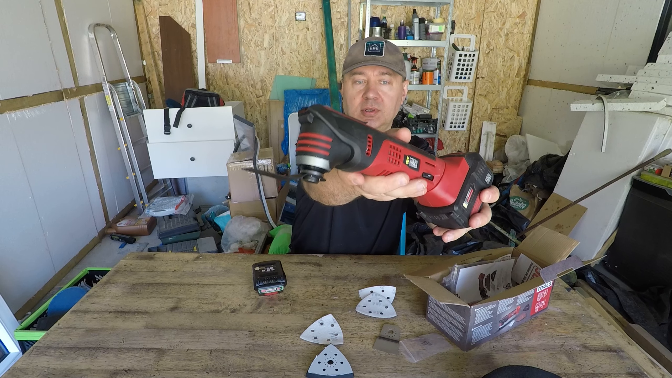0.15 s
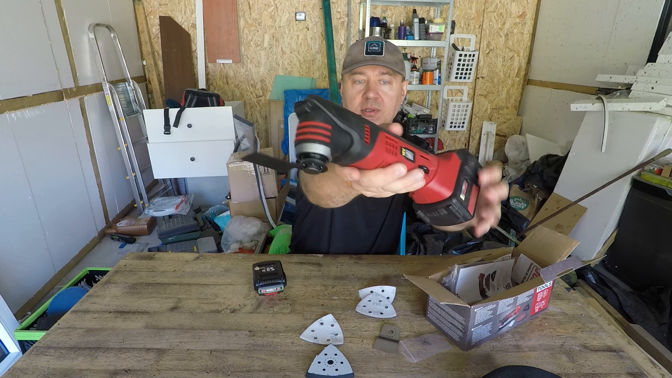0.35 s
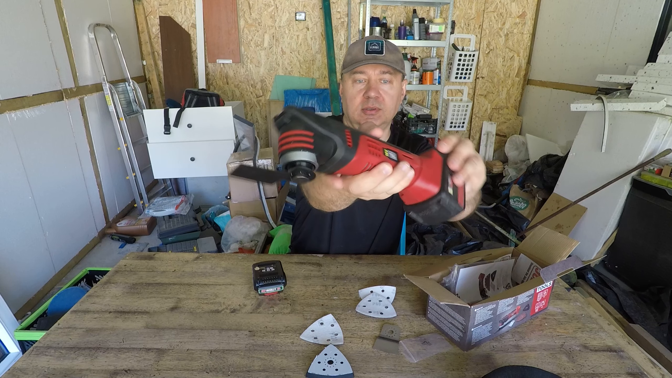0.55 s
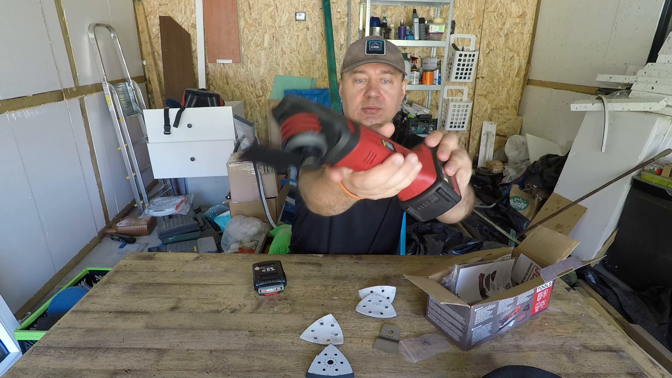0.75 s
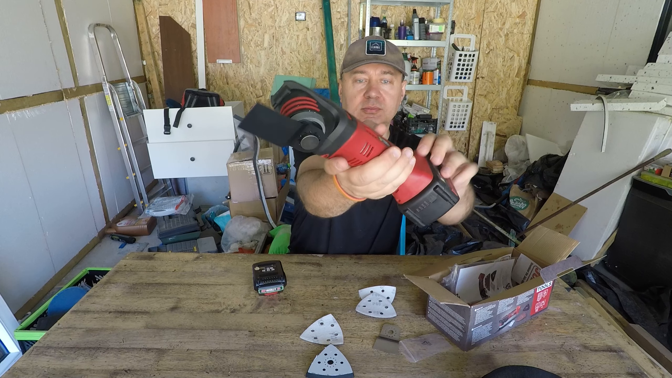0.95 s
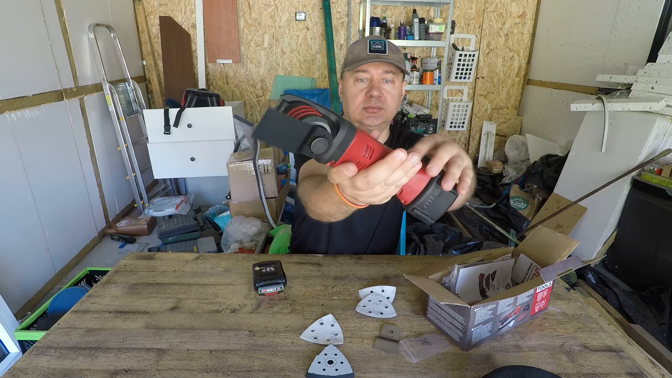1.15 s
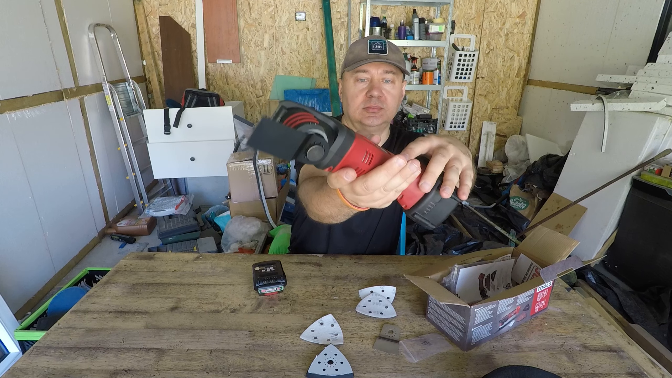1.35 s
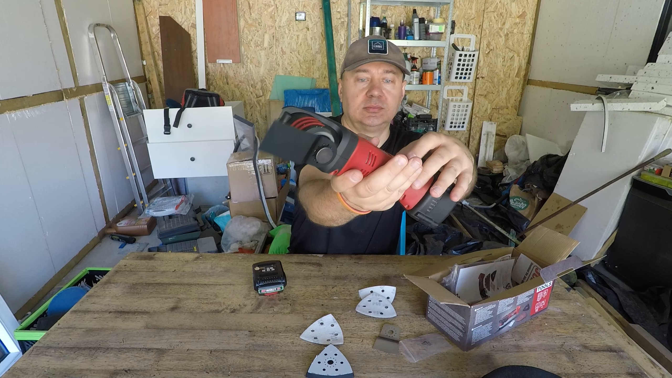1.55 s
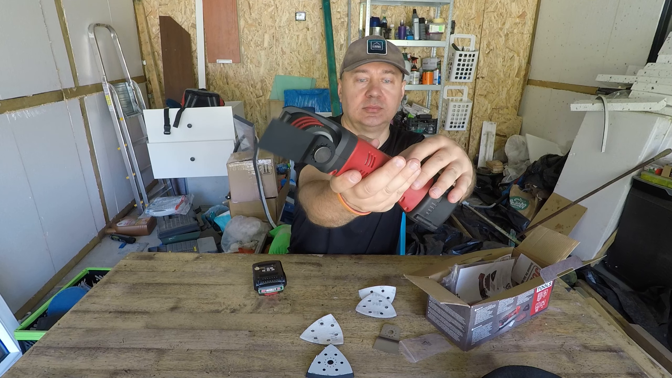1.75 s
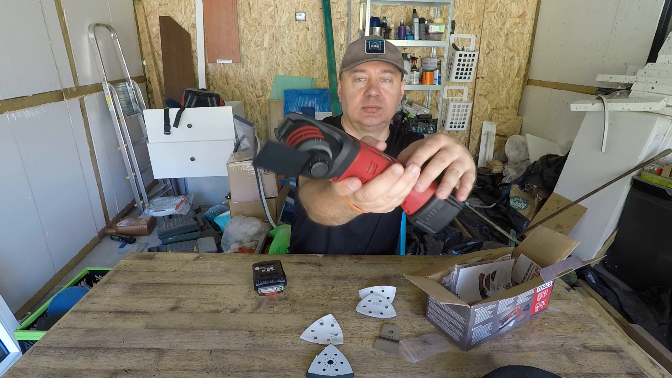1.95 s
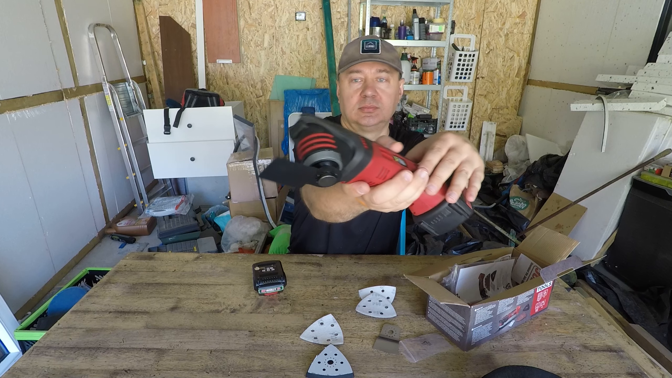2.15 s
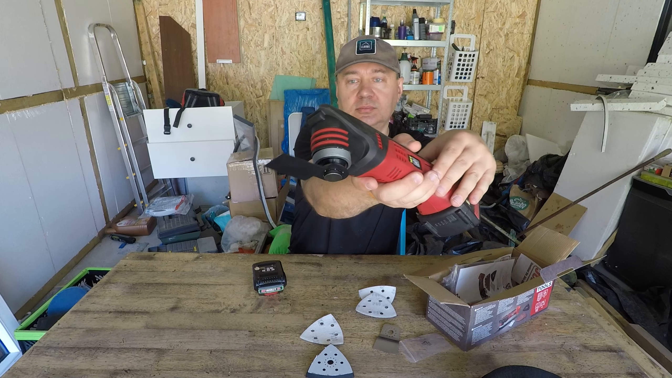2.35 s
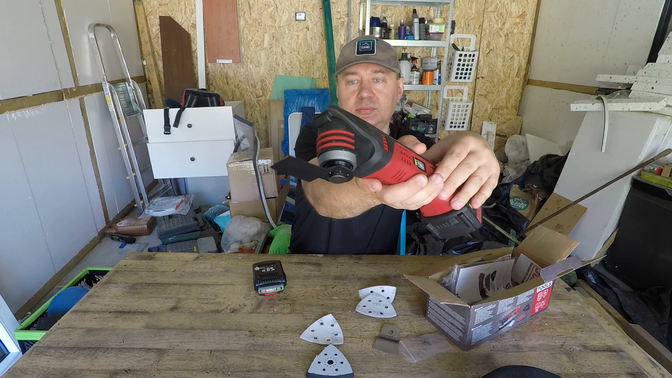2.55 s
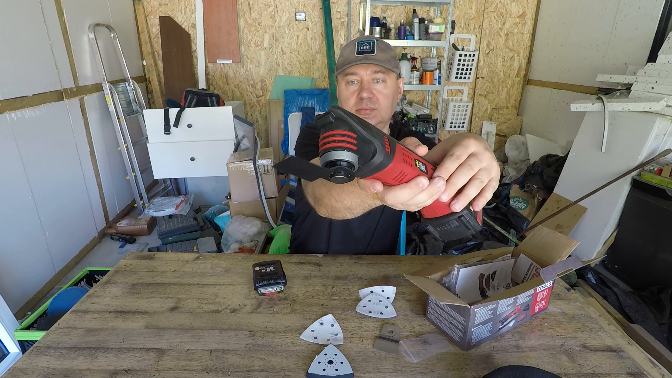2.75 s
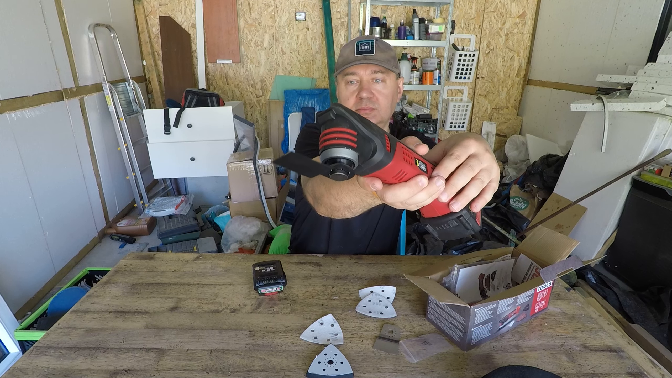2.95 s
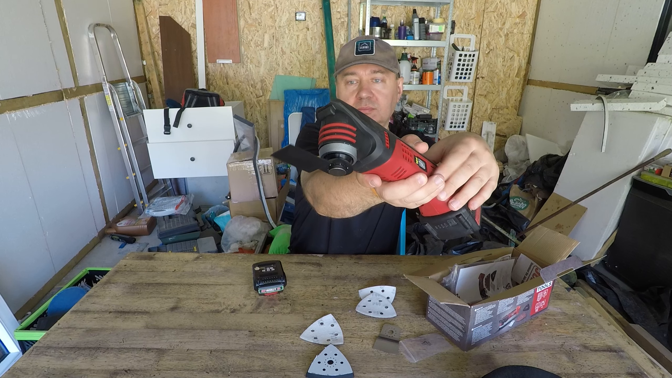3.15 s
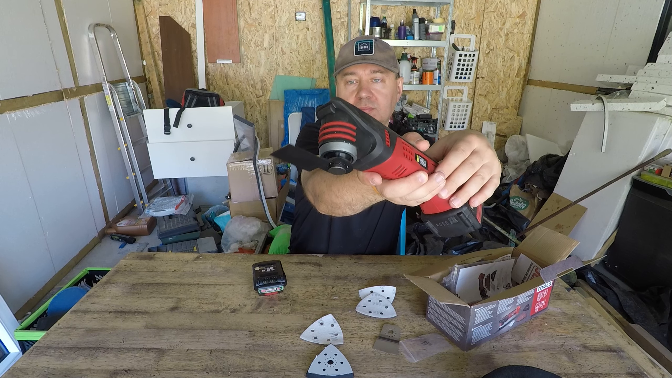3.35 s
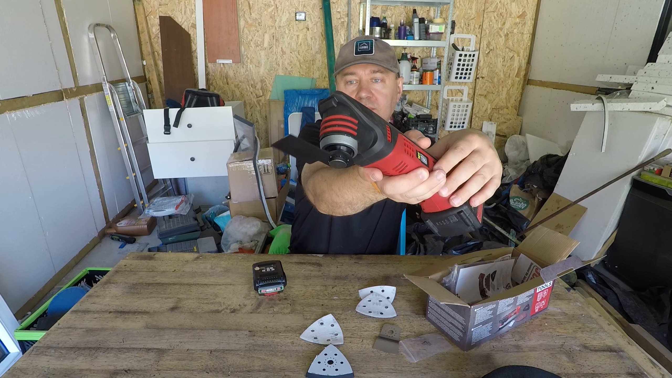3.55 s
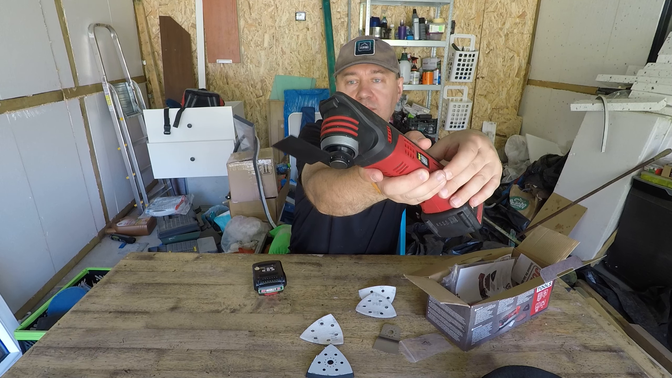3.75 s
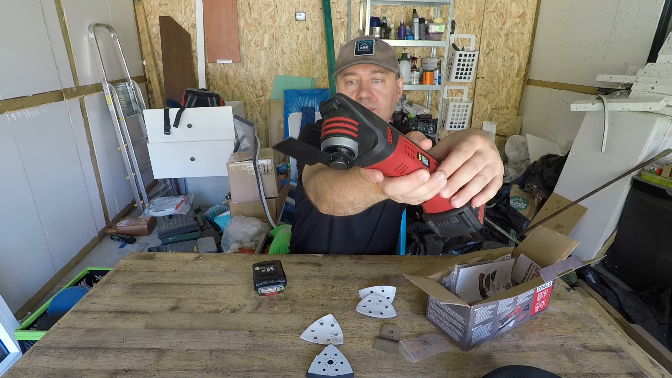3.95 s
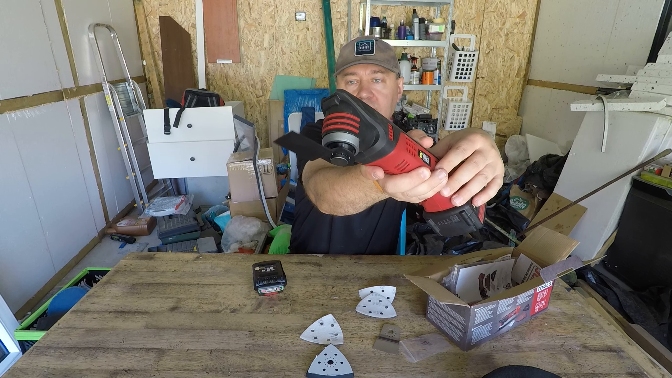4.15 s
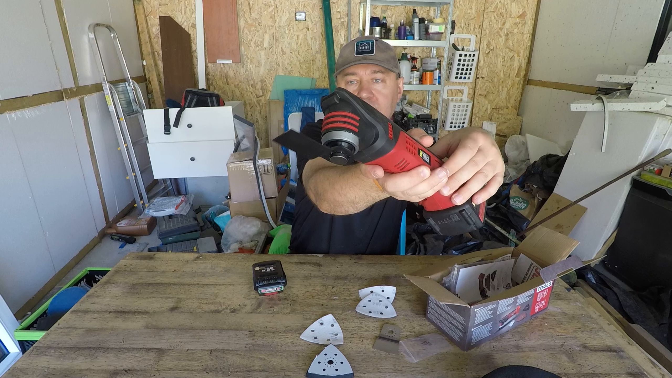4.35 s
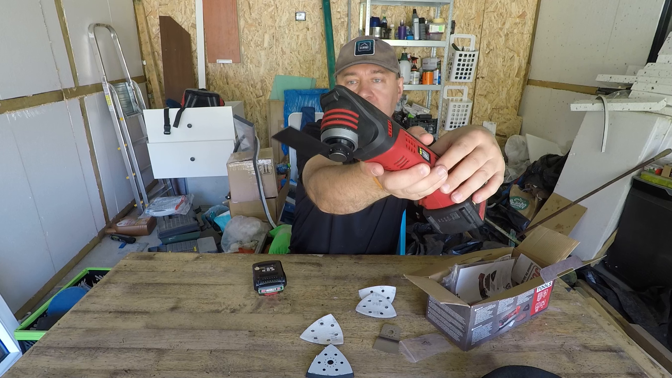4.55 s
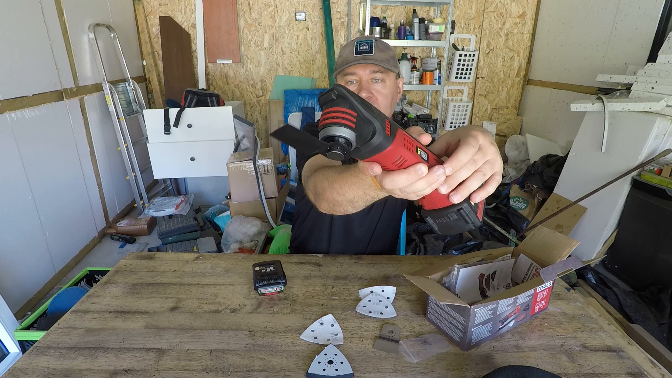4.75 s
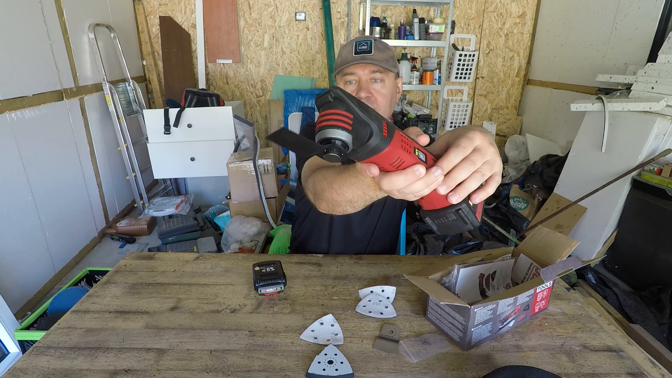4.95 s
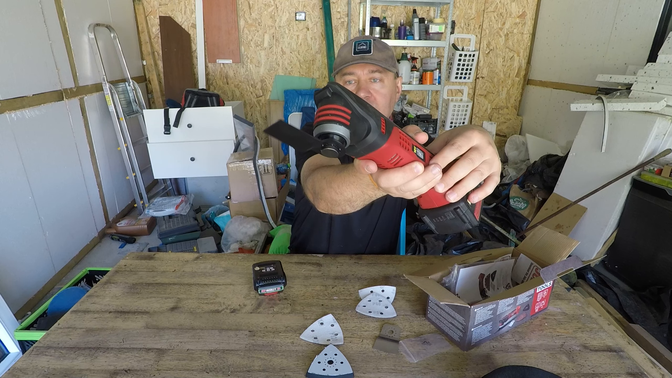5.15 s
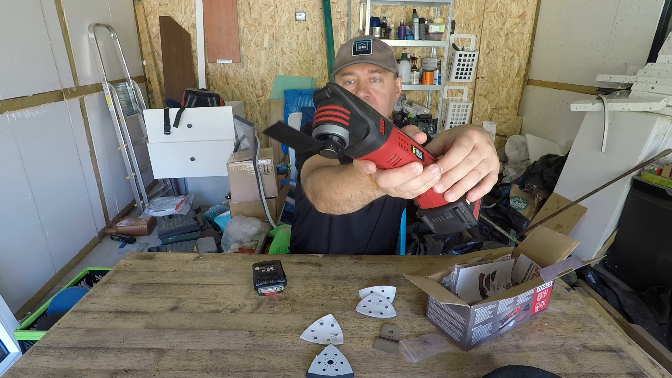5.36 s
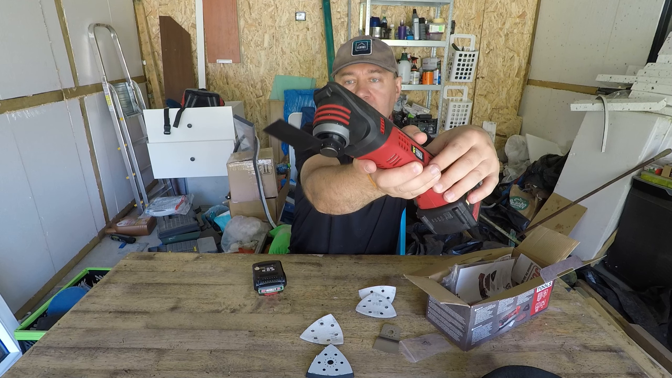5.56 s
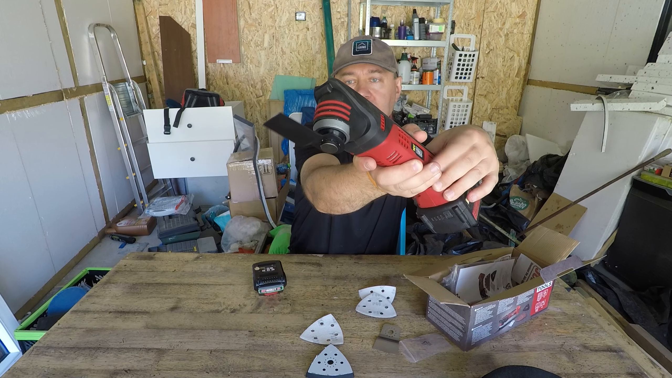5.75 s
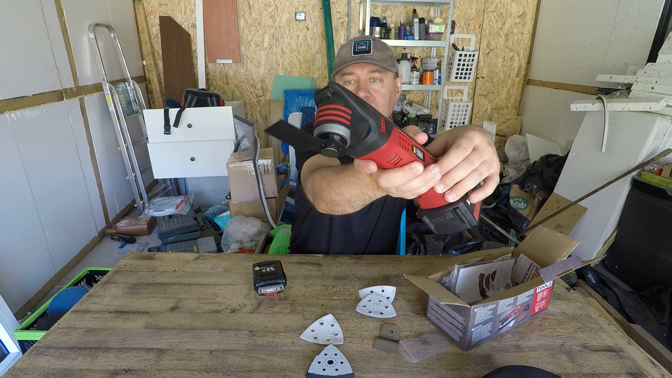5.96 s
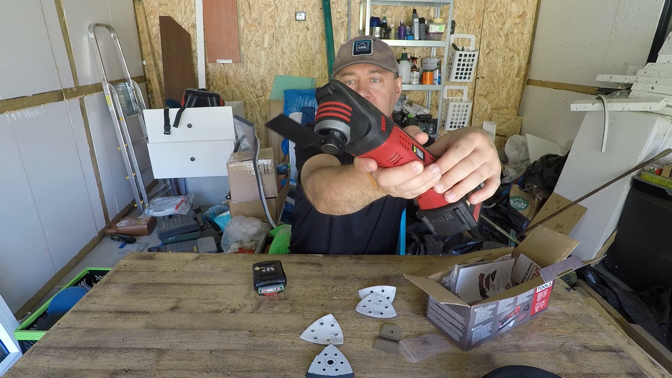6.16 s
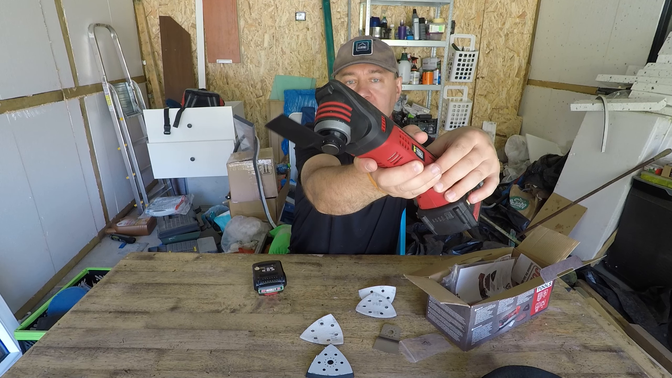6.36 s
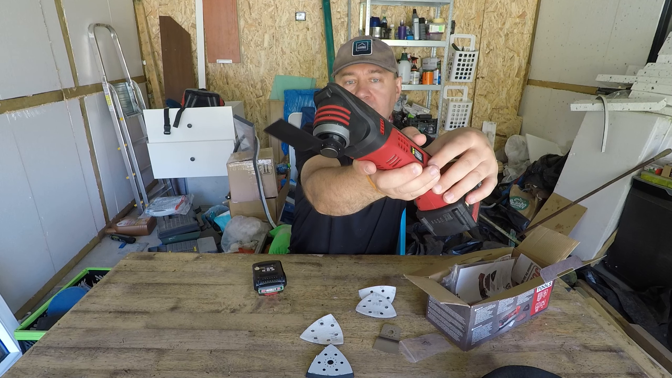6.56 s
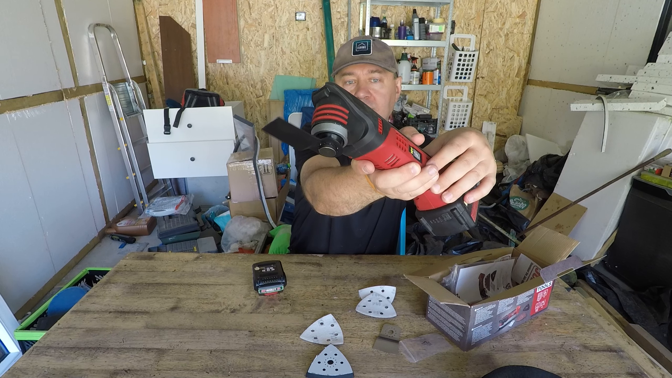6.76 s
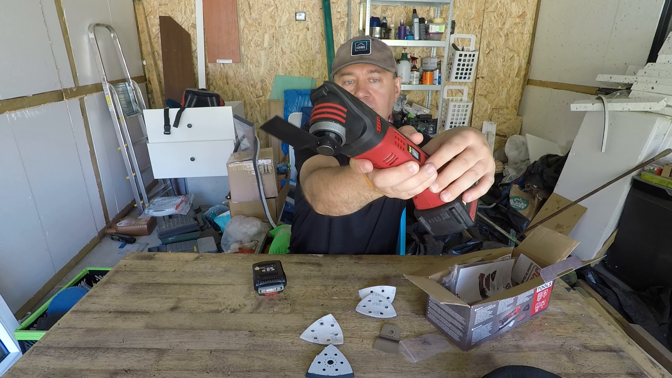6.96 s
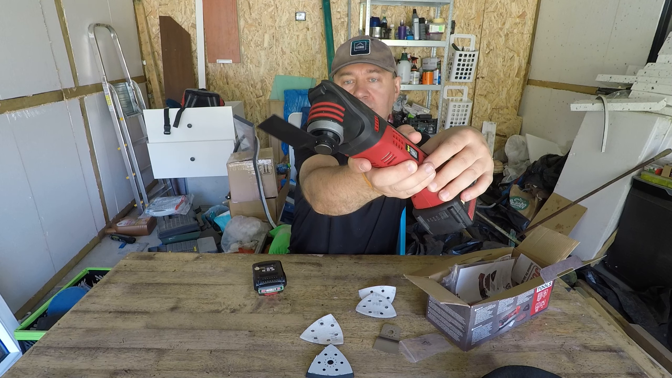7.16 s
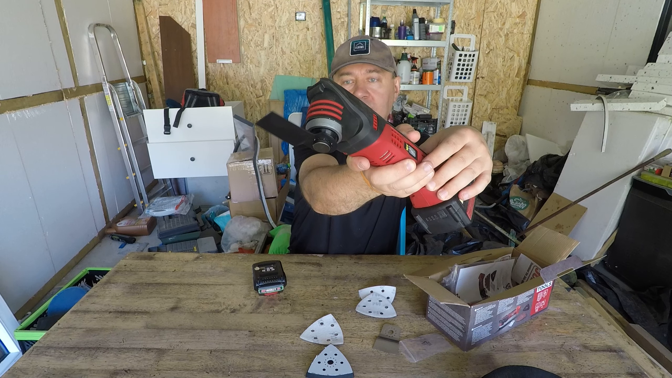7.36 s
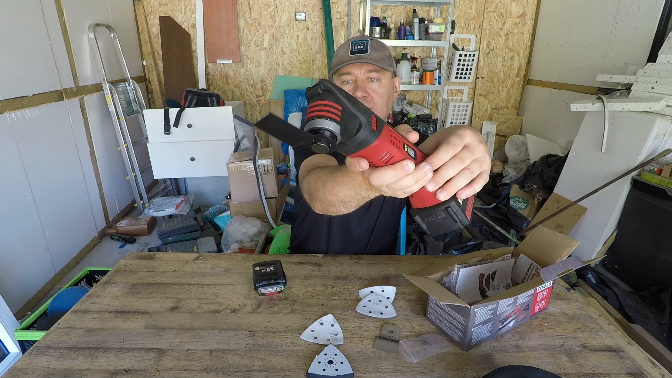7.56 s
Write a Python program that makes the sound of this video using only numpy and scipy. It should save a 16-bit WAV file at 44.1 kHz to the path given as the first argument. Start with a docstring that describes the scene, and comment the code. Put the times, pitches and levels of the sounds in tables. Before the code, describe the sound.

A cordless oscillating tool is already running unloaded in a small garage, close to a microphone with little bass. From 0 to 2.5 seconds it idles slowly: a quiet, dry, grainy rattle with a low buzz, a thin high electronic tone and brief soft finger rubs on the grip. At about 2.5 and 2.8 seconds the speed rises in quick succession, then again near 3.4, 3.9, 4.5 and 5.0, each step pushing the pitch up with a short surge of effort and rougher clatter, then settling briefly. Around 5.5 it reaches full speed, much louder: a dense, piercing, buzzy whine with airy fan hiss and short bare-wall reflections. It holds steadily, its tone colour shifting around 6.2 and flickering briefly near 7.1 and 7.4. At about 7.6 the pitch starts to drop slightly as the sound ends, still running.

```python
"""In a garage, a cordless oscillating tool runs unloaded at arm's length from a small microphone.
Its dial steps the motor up, with one small step down at the end; after each click the motor works harder.
The eccentric shaft hums on multiples of its turn rate through the housing, and the fork rattles twice a turn.
The fan hisses, the speed controller sings a thin tone, fingers slide on the grip and hands rumble below.
The sound passes through bare-wall reflections (rattle only) and a microphone that cuts the bass and the top."""
import sys
import numpy as np
from scipy import signal
from scipy.fft import rfft, irfft
from scipy.io import wavfile
from scipy.ndimage import uniform_filter1d

SR = 44100
rng = np.random.default_rng(int(sys.argv[2]) if len(sys.argv) > 2 else 0)


def transcribe(signal):
    """Save signal, clipped to [-1, 1], as a 16-bit WAV file at the path in sys.argv[1]."""
    frames = np.atleast_2d(signal).T
    limited = np.clip(frames, -1, 1)
    pcm = np.round(limited * 32767).astype(np.int16)
    wavfile.write(sys.argv[1], SR, pcm)


N = 339570

# clicks of the speed dial, the first row being the setting at the start:
# click_s, turn_rate_hz, motor_lag_s
DIAL_CLICKS = [(0, 66.05, .1), (2.512, 85.6, .084), (2.805, 98.5, .142), (3.386, 133.3, .068),
               (3.934, 159.8, .079), (4.478, 188, .053), (4.972, 221.7, .049), (5.487, 251.6, .038),
               (7.632, 233, .041)]


def hum(turn_hz, turn, hum_db, move_db, effort, count=58, step=32):
    """Forced vibration: harmonics of the turn rate, weighted by housing resonances, each wandering."""
    # strongest harmonics at full speed, changing over as the tool is turned:
    # order, arrival_lift_db, first_db, later_db, change_s, flip_lift_db
    whine_rows = [(1, -2, -28.5, -27, 6.2, 0.1), (2, 7.5, -36.5, -36.5, 6.2, 10.5),
                  (3, -4.5, -20.5, -23.5, 6.2, 0.5), (4, 5.5, -35.5, -43, 6.4, 11.5),
                  (5, 7, -35, -42, 7.8, -1.5), (6, 17, -36, -34, 6.34, 7), (7, 2.5, -28, -33, 6.58, -1.5),
                  (8, 1.5, -22.5, -35, 6.19, 0.5), (9, 4.5, -28.5, -21, 6.26, -7),
                  (10, 4, -29.5, -37, 6.86, 2), (13, 7, -42, -32.5, 6.3, 7),
                  (14, -20, -17.5, -29.5, 6.52, -4), (15, -2, -21.5, -36.5, 6, 8),
                  (16, 0, -24, -21.5, 6.7, -11), (18, -3, -22.5, -21, 6.8, -8),
                  (19, 7, -42, -27.5, 6.1, -11), (20, -1, -30, -28, 6.25, -6), (22, -16, -26, -32, 6.8, -2)]
    # the other harmonics at full speed: order, level_db (re full_db)
    full_rows = [(11, -11.5), (12, -13), (17, -15), (21, -12), (23, -13.5), (24, -9.5), (25, -13),
                 (26, -17.5), (27, -23), (28, -20), (29, -17.5), (30, -15.5), (31, -24), (32, -21.5),
                 (33, -37), (34, -41)]
    # harmonics that stand out while a dial setting holds, one list a setting:
    # order, level_db, surge_lift_db
    held_lists = [
        [(10, -53.5, 0)],
        [(4, -47, 1.5), (5, -38, -4.5), (11, -31, -7.5), (15, -39, -1)],
        [(1, -45.5, 5), (2, -44.5, -4), (4, -37, -4.5), (5, -38, 3), (6, -34.5, -11), (7, -46.5, 12),
         (11, -31.5, -7), (12, -32.5, -5), (15, -43, 22), (23, -42, 8), (28, -38.5, 8), (54, -54, -9),
         (55, -49, -9)],
        [(1, -41, 9), (2, -42, -7), (3, -37, 1.5), (5, -27, -8), (8, -36, 5), (10, -30.5, 2), (12, -27.5, -3),
         (14, -40, 17), (20, -28.5, 0.5)],
        [(1, -29, -2.5), (2, -53.5, 3), (3, -35, 9), (4, -21.5, -14.5), (5, -31, -11), (6, -38, 1.5),
         (8, -36, 1.5), (9, -34.5, 4), (10, -33, 10), (11, -34, 18), (13, -42, -6), (14, -32, -8), (15, -42, 2),
         (16, -39, -3), (17, -34, -3), (18, -20.5, -5), (19, -30, -5), (20, -23.5, 3), (21, -32, 1.5),
         (22, -33, 1), (23, -32, -3)],
    ]
    # indices into the dial clicks, one for each list of held harmonics
    held_rows = (0, 3, 4, 5, 6)
    # resonances of the housing: centre_hz, width_hz (at half gain), gain_db
    housing = [(200, 210, -24), (338, 115, -21.5), (506, 100, -19), (665, 50, -15), (737, 41, -20.5),
               (911, 120, -15), (1160, 89, -25), (1230, 140, -19.5), (1434, 50, -12.5), (1720, 180, -21),
               (1863, 87, -11), (2250, 84, -12.5), (2320, 100, -15.5), (2510, 190, -19), (2980, 210, -18),
               (3696, 65, -10.5), (3960, 110, -13.5), (4385, 102, -10), (4830, 730, -23.5),
               (5600, 350, -17.5), (6340, 570, -34), (7550, 370, -40), (8770, 550, -38), (10110, 150, -42),
               (13300, 860, -39.5)]
    # brief drops of the whine to low harmonics: centre_s, length_s, depth (factor on the lift)
    flip_rows = [(7.094, 0.025, 0.88), (7.413, 0.047, 1.08)]
    # a low harmonic that swells at idle: order, start_s, end_s, level_db
    drone_order, drone_start, drone_end, drone_db = (3, 0.8, 1.5, -48.5)
    settle_lags, hold_on_s, blend_s = 2.93, 0.097, 0.079  # held harmonics last into the next setting
    full_row, full_db, arrival_s, change_s = 7, -22, 0.17, 0.09
    whine_wander_db, strain_rough_db = 2, 5

    s = np.arange(0, N, step) / SR  # gains are computed once every few samples

    def ramp(late):
        return np.clip(late / blend_s + 1, 0, 1)

    def by_order(table):
        return {round(row[0]): row[1:] for row in table}

    whines, others = by_order(whine_rows), by_order(full_rows)
    held_tables = [by_order(table) for table in held_lists]
    # the hum breaks up while the speed changes
    rough_db = strain_rough_db * strain(turn_hz)[::step]
    flip = sum(depth * np.exp(-((s - at) / length) ** 4) for at, length, depth in flip_rows)
    late = s - DIAL_CLICKS[full_row][0] - hold_on_s
    full = ramp(late)
    arrival = np.exp(-np.maximum(late, 0) / arrival_s)

    out = 0
    for k in range(1, count + 1):
        drive_db = hum_db[::step] + 2.0 * walk(4.94)[::step]
        gain = resonance(k * turn_hz[::step], housing) * undb(drive_db)

        for row, orders in zip(held_rows, held_tables):
            if k not in orders:
                continue
            start, _, lag = DIAL_CLICKS[row]
            if row > 0:
                start = start + settle_lags * lag
            end = DIAL_CLICKS[row + 1][0] + hold_on_s
            held = ramp(np.minimum(s - start, end - s))
            level_db, lift_db = orders[k]
            gain = (1 - held) * gain + held * undb(level_db + lift_db * effort[::step])

        if k == round(drone_order):
            drone = ramp(np.minimum(s - drone_start, drone_end - s)) * undb(drone_db)
            gain = np.maximum(gain, drone)

        if k in whines:
            arrival_db, first_db, later_db, at, flip_db = whines[k]
            db = first_db + (later_db - first_db) / (1 + np.exp((at - s) / change_s))
            db = db + arrival_db * arrival + flip_db * flip
            db = db + whine_wander_db * min(k / 8, 1) * walk(8.)[::step]
            gain = (1 - full) * gain + full * undb(db)
        elif k in others:
            db = full_db + others[k][0] + 3.3 * walk(6.)[::step]
            gain = (1 - full) * gain + full * undb(db)

        # the bearing cage rolls slower than the shaft and beats the higher harmonics
        cage_turn = .22 * turn[::step] + rng.uniform()
        cage = 1 + 0.084 * min(k / 14, 1) * np.sin(2 * np.pi * cage_turn)
        shift_db = move_db[::step] + 1.35 * walk(20.)[::step] + rough_db * walk(45.)[::step]
        gain = np.repeat(gain * cage * undb(shift_db), step)[:N]
        out = out + gain * np.sin(2 * np.pi * (k * turn + rng.uniform()))
    return np.sqrt(2) * out


def knocks(turn, depth, weak=0.94, tail=0.41, limp=0.24, scatter_db=2.5):
    """Periodic impacts: the eccentric strikes each side of the fork, harder every second turn."""
    half = (2 * turn).astype(int)
    n = np.arange(half[-1] + 1)
    size = undb(scatter_db * rng.standard_normal(len(n)))
    size = size * np.where(n % 2, weak, 1) * np.where(n % 4, 1, 1 + limp)
    phase = 2 * turn - half
    burst = unit(size[half] * phase * np.exp(-phase / tail) * (1 - phase))
    depth = np.clip(depth, 0, 1)
    return (1 - depth + depth * burst) / np.sqrt(1 - .4 * depth * (1 - depth))


def rattle(turn_hz, turn, depth):
    """Impact-modulated noise: loose parts chatter in a colour set by speed, the treble knocking harder."""
    # spectrum of the rattle at low speed, before the fork resonances: frequency_hz, density_db (per Hz)
    slow_colour = [(200, -50), (320, -11), (500, -9.5), (900, -6.5), (1300, -5.5), (1900, -8.5),
                   (2800, -5.5), (3300, -4.5), (4200, -2), (5400, -4.5), (6500, -10.5), (8000, -41),
                   (11000, -52)]
    # spectrum of the rattle at full speed: frequency_hz, density_db (per Hz)
    fast_colour = [(200, -41), (400, -23), (800, -13), (1500, -13), (2200, -8.5), (3200, -11), (3700, -2.5),
                   (4800, -1.5), (6200, -6.5), (6700, -14), (8000, -17.5), (11000, -79)]
    # resonances of fork and blade, heard at low speed: centre_hz, width_hz (at half gain), gain_db
    fork = [(652, 48, 0), (1440, 38, 1.5), (1790, 290, 2.5), (2370, 54, 3.5), (3560, 320, 4),
            (4260, 91, -1.5), (4660, 43, 8), (5170, 570, -3), (6240, 51, 7)]
    split_hz = 2800
    fast = np.clip((turn_hz - 110) / 120, 0, 1)
    parts = []
    for share, side in ((.7, 0), (1.4, 1)):
        noise = knocks(turn, share * depth) * rng.standard_normal(N)
        slow_sound = unit(colour(noise, slow_colour, fork))
        fast_sound = unit(colour(noise, fast_colour))
        both = (1 - fast) * slow_sound + fast * fast_sound
        parts.append(halves(both, split_hz)[side])
    return parts


def blade(turn_hz, turn):
    """Impulse-excited resonance: at middling speeds the sharpest knocks ring the blade."""
    # resonances of the blade: centre_hz, width_hz (at half gain), gain_db
    blade_modes = [(1950, 570, -2), (5400, 560, -2)]
    blows = knocks(turn, 0.69, limp=1.1, scatter_db=1.0) ** 1.25
    blows = blows * np.sign(rng.standard_normal(N))
    hz = np.arange(N // 2 + 1) * SR / N
    ring = irfft(rfft(blows) * resonance(hz, blade_modes), N)
    return unit(ring) * np.exp(-((turn_hz - 105) / 30) ** 2)


def garage(x):
    """Reverberation: dense, decaying reflections off bare walls make the spectrum ragged."""
    t60_s, level_db = .3, -12
    t = np.arange(SR // 2) / SR
    tail = rng.standard_normal(len(t)) * np.exp(-np.log(1000) * t / t60_s) * (t > .004)
    tail = tail / np.sqrt(np.sum(tail ** 2))
    return x + undb(level_db) * signal.fftconvolve(x, tail)[:N]


def fan_hiss(gate):
    """Turbulent flow noise: broadband air noise pulsed by the knocks, split into body and top."""
    # spectrum of the fan: frequency_hz, density_db (per Hz)
    fan_colour = [(5000, -25), (7000, -5), (8000, -9.5), (8700, -2.5), (9300, -7.5), (10300, -13.5),
                  (11200, -29), (12200, -5), (13200, -4), (14000, -13), (15100, -16)]
    return halves(colour(gate ** 0.8 * rng.standard_normal(N), fan_colour), 10600)


def controller(turn):
    """Amplitude modulation: a tone of fixed pitch with two overtones, shaken once a turn."""
    # tone of the speed controller: time_s, level_db
    sing_levels = [(0, -48), (.7, -45), (1.6, -51), (2.5, -45.5), (3, -71), (3.5, -64), (4, -79)]
    pitch_hz = 3338.5
    t = np.arange(N) / SR
    tone = 0
    for k, db in enumerate((0.0, -17, -30), start=1):
        tone = tone + undb(db) * np.sin(2 * np.pi * k * pitch_hz * t)
    shake = 1 + 0.31 * np.sin(2 * np.pi * turn)
    return np.sqrt(2) * undb(curves(sing_levels)[0]) * shake * tone


def slides(gate):
    """Friction noise: fingers slide on the grip in short band-limited swells, pulsed by the knocks."""
    # swells of rubbing: centre_s, peak_db (before the pulsing), length_s, centre_hz, width_hz
    slide_rows = [(.47, -33.5, 0.019, 4200, 2000), (0.86, -33.5, 0.015, 3800, 3000),
                  (1.482, -32, 0.032, 220, 139), (1.613, -40, 0.065, 255, 200),
                  (3.297, -38, 0.043, 179, 100)]
    t, out = np.arange(N) / SR, 0
    for s, db, length, hz, width in slide_rows:
        band = [(hz - width, -30), (hz - width / 2, 0), (hz + width / 2, 0),
                (hz + width, -20), (4 * hz, -60)]
        band = [(max(f, 20), g) for f, g in band]
        rub = unit(colour(rng.standard_normal(N), band))
        out = out + undb(db) * np.exp(-.5 * ((t - s) / length) ** 2) * rub
    return gate * out


def hand_rumble():
    """Low-pass noise: the hands' rumble falls away above about 200 Hz."""
    return unit(colour(rng.standard_normal(N), [(20, 5), (100, 7.5), (180, 8.5), (300, 0.5), (500, -19.0)]))


def follow(values, slower=1, creep=0):
    """Critically damped step response: each dial value is reached after its click; a small share creeps."""
    creep_s = .82
    t, out = np.arange(N) / SR, np.full(N, 1. * values[0])
    for (s, _, lag), step in zip(DIAL_CLICKS[1:], np.diff(values)):
        u = np.maximum(t - s, 0)
        x = u / (lag * slower)
        missing = (1 - creep) * (1 + x) * np.exp(-x) + creep * np.exp(-u / creep_s)
        out = out + step * (1 - missing)
    return out


def surge(strengths):
    """Transient load: the motor's effort rises after each click and dies away."""
    lags_to_peak = 2.33
    t, out = np.arange(N) / SR, 0
    for strength, (s, _, lag) in zip(strengths, DIAL_CLICKS):
        u = np.maximum(t - s, 0) / (lags_to_peak * lag)
        out = out + strength * (u * np.exp(1 - u)) ** 1.8
    return out


def strain(turn_hz):
    """Relative acceleration: how fast the speed changes, saturating from 0 towards 1."""
    scale_per_s = 2.1
    return np.tanh(np.abs(np.gradient(np.log(turn_hz))) * SR / scale_per_s)


def undb(db):
    """Decibels to amplitude ratio."""
    return 10 ** (np.asarray(db) / 20)


def unit(x):
    """Normalise to an rms of 1."""
    return x / np.sqrt(np.mean(x ** 2))


def curves(table):
    """Linear interpolation: columns of a table, one value per sample."""
    s, *columns = np.transpose(table)
    return [np.interp(np.arange(N) / SR, s, c) for c in columns]


def walk(rate):
    """Smoothed random fluctuation: levels held 1 / rate s and slewed twice; spread near 1."""
    k = int(SR / rate)
    held = np.repeat(rng.standard_normal(N // k + 1), k)
    return 1.36 * uniform_filter1d(uniform_filter1d(held, k), k)[:N]


def resonance(hz, modes):
    """Modal superposition: gain of a set of resonances, summed in power."""
    power = 0
    for f, w, db in modes:
        power = power + undb(2 * db) / (1 + (2 * (hz - f) / w) ** 2) ** 2
    return np.sqrt(power)


def colour(x, points, modes=None):
    """Linear filtering: shape a spectrum by (Hz, dB) points and lift it at resonances."""
    hz = np.arange(N // 2 + 1) * SR / N + 1
    point_hz, point_db = np.array(points).T
    gain = undb(np.interp(np.log(hz), np.log(point_hz), point_db))
    if modes:
        gain = gain * (1 + 1.07 * resonance(hz, modes))
    return irfft(rfft(x) * gain, N)


def halves(x, hz):
    """Band splitting: the parts under and over a frequency, each at rms 1."""
    low = colour(x, [(hz, 0), (hz + 60, -40)])
    return unit(low), unit(x - low)


def scene():
    """Superposition: all layers follow one dial, and a simple side signal spreads the high treble in stereo."""
    # one row per dial setting, levels before swells, moves and trims: rattle_db, bright_db (re dull part),
    # hum_db (before the housing), fan_db, top_hiss_db, rumble_db, knock_depth (0-1), surge (0-1)
    setting_rows = [(-34, 1.5, -41, -54.5, -65, -44, 0.23, 0.1), (-31, 3.5, -37, -54, -55, -44.5, 0, 0.17),
                    (-29.5, 2.5, -30, -46, -57, -43.5, 0.27, 0.13),
                    (-28.5, 2, -29.5, -49, -59, -45, 0.15, 1.),
                    (-28.5, 5.5, -21.5, -48, -46, -45, 0.36, 0.72), (-23, 6, -18, -51, -43, -41, 0, 0.49),
                    (-22, 5.5, -13.5, -55, -43, -34.5, 0.4, 0.54),
                    (-19, 4.5, -7, -35.5, -35.5, -35.5, 0.44, 0), (-14, -5, -13, -30, -41, -36, 0.2, 0.6)]
    # the tool is moved about in front of the microphone: time_s, level_db, bright_db (of the rattle)
    move_rows = [(0, 1.7, -2.5), (.45, 1.5, -1.5), (.8, -0.7, -0.5), (1.3, -0.5, -2), (1.4, 1.1, 1.5),
                 (2.2, 0.9, 3), (2.38, 3, 1.5), (2.55, -0.5, -1), (3.06, 0.9, 1), (3.3, -1, 0.5),
                 (3.9, 0.1, 0.3), (4.45, -1, 0.3), (4.95, -0.5, -0.4), (5.45, -0.5, -0.5), (6.1, -0.14, -1),
                 (6.8, -0.16, -0.5), (7.3, -0.5, 1.5), (7.7, -0.1, -0.5)]
    # gain of the side signal against the middle: frequency_hz, gain_db
    side_gain = [(20, -110), (4800, -95), (5900, -36), (7000, -19), (9500, -13), (11000, -7), (15000, -7)]
    air_lag = 2.8  # the hiss follows a click this many times slower than the shaft

    (rattle_db, bright_db, hum_db, fan_db, top_db,
     rumble_db, depth, strengths) = np.transpose(setting_rows)
    turn_hz = follow(np.transpose(DIAL_CLICKS)[1], creep=.053)
    turn = np.cumsum(turn_hz) / SR
    effort, depth = surge(strengths), follow(depth)
    move_db, facing_db = curves(move_rows)
    gate = knocks(turn, depth)

    dull, bright = rattle(turn_hz, turn, depth)
    parts = dull + undb(follow(bright_db) + facing_db) * bright + undb(4.0) * blade(turn_hz, turn)
    # the rattle grows while the speed changes
    clatter_db = follow(rattle_db) + 3.5 * effort + 2.5 * strain(turn_hz) + move_db - 6.0
    clatter = garage(undb(clatter_db) * parts)

    fan, top = fan_hiss(gate)
    hiss = fan * undb(follow(fan_db, air_lag) + 4.5 * effort)
    hiss = hiss + top * undb(follow(top_db, air_lag) + 7 * effort + 1.7 * walk(14.))

    tool = clatter + hum(turn_hz, turn, follow(hum_db) + 4 * effort, move_db, effort) + hiss
    rumble = hand_rumble() * undb(follow(rumble_db) + 1.0 * walk(12.0))
    mid = tool + controller(turn) + slides(gate) + rumble
    # a delayed, filtered copy of the tool, heard only in the high treble; the shift is in samples
    side = colour(np.roll(tool, 900), side_gain)
    return np.array([mid + side, mid - side])


def record(dry):
    """Saturation and band limiting: the microphone rounds peaks and cuts the bass and top steeply."""
    # deep room rumble: frequency_hz, gain_db (on white noise)
    room_rumble = [(20, -64), (60, -50), (110, -66), (200, -90)]
    low_hz, top_hz = 144, 15200
    mid = dry.mean(axis=0)
    rounded = dry - mid + np.tanh(0.93 * mid) / 0.87
    bass_cut = signal.butter(10, low_hz, "high", fs=SR, output="sos")
    heard = signal.sosfilt(bass_cut, rounded)
    heard = heard + colour(rng.standard_normal(N), room_rumble)
    top_cut = signal.ellip(12, .2, 80, top_hz, fs=SR, output="sos")
    return signal.sosfilt(top_cut, heard)


dry = scene()
out = record(dry)
transcribe(out)
```